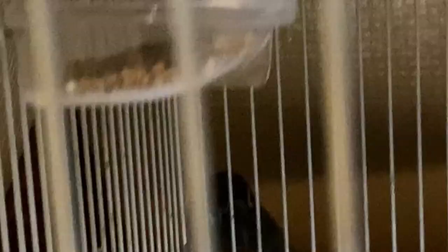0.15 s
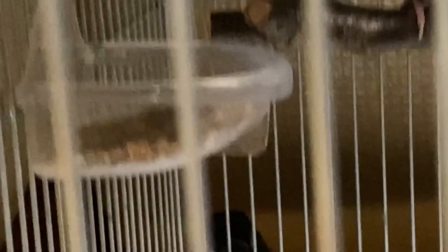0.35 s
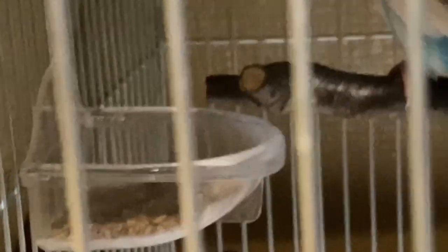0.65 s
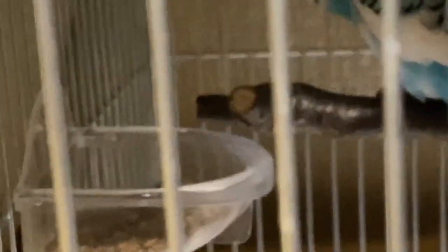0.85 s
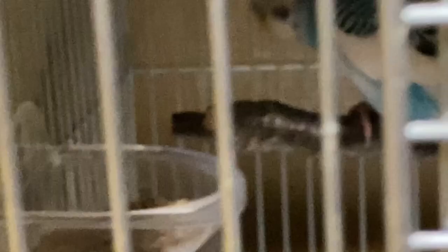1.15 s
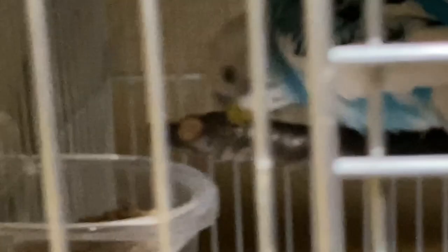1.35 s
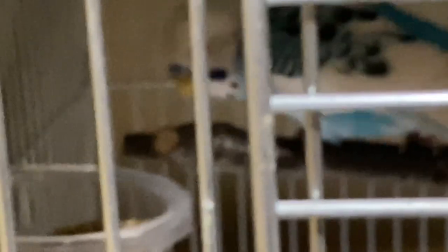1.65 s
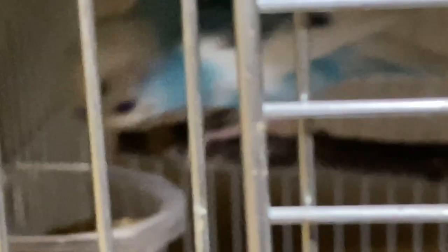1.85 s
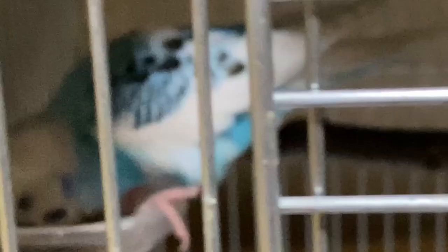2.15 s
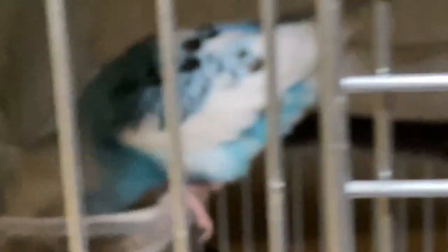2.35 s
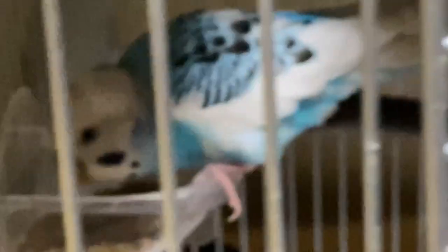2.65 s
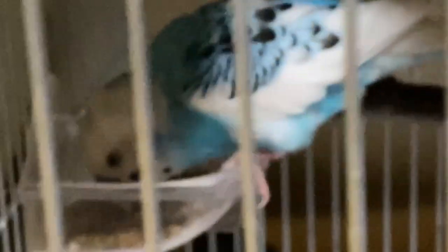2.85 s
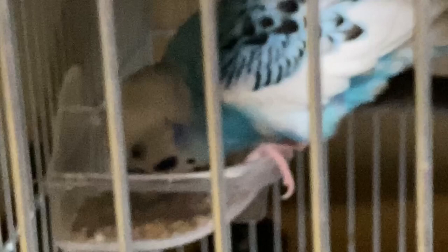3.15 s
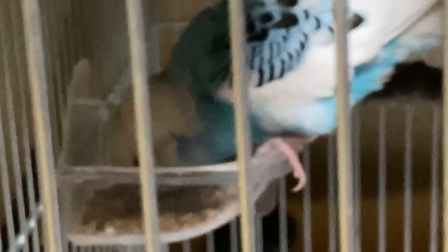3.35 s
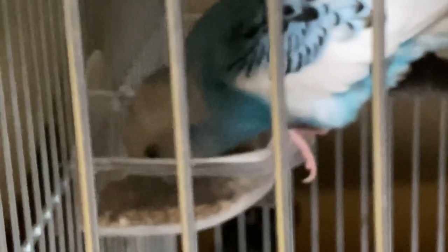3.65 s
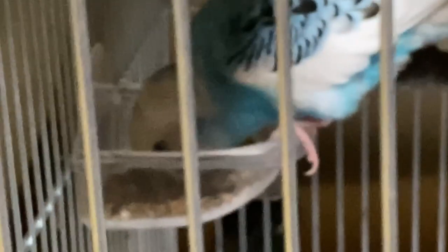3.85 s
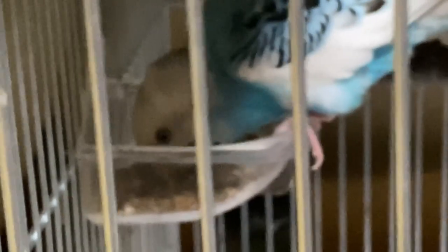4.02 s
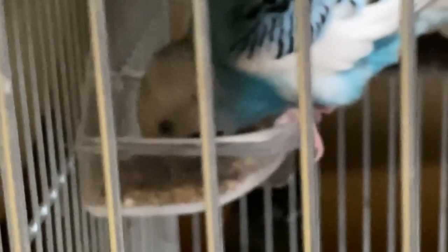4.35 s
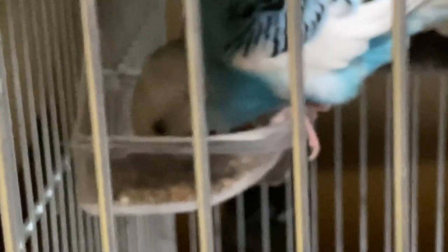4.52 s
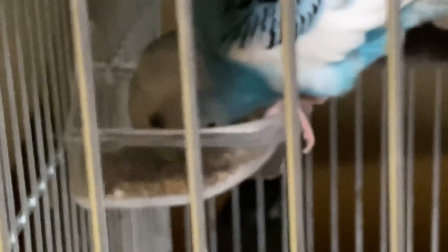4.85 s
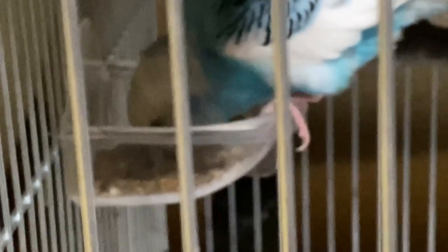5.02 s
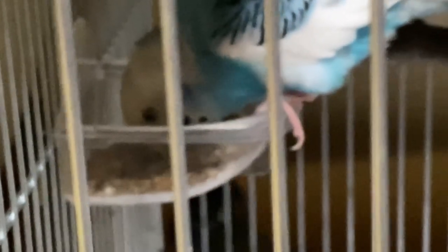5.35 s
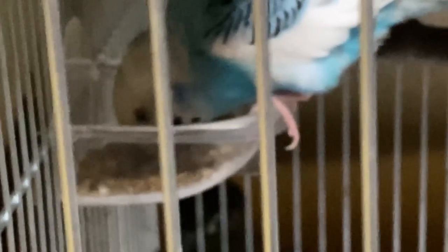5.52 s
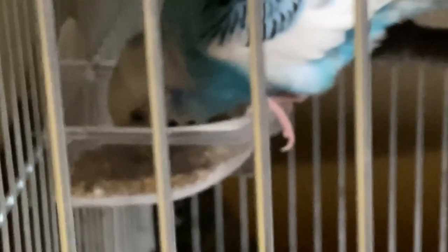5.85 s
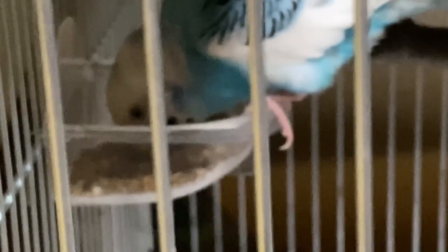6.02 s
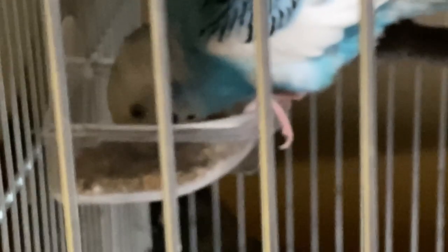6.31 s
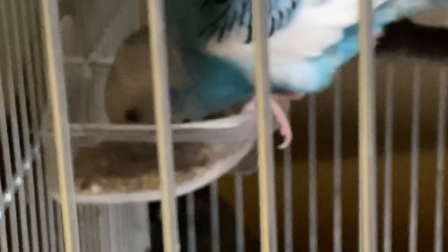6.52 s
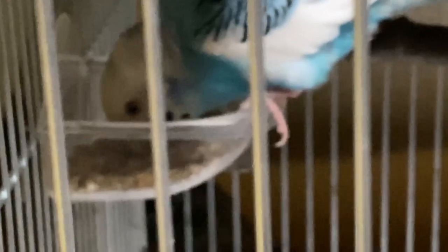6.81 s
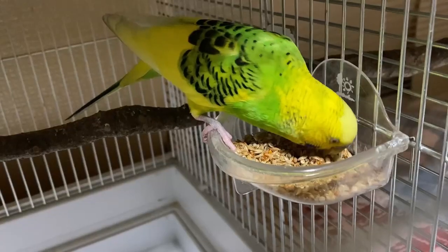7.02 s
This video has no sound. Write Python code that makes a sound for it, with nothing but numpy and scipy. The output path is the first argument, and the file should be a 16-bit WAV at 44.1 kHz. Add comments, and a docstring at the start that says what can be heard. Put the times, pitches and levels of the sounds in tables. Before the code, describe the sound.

A budgerigar moves about a wire cage, knocking the bars so that they ring. It gives one brief, harsh two-part squawk, followed by a soft murmur and a ruffle of feathers. Its feet thud along the perch and its claws tick on a plastic dish. Then it stirs seed and cracks husks, with occasional knocks on the cage. The microphone is close, in a quiet room with faint hiss and rumble.

```python
"""A quiet room, budgerigars in a wire cage, heard close up on a hand-held phone's two microphones.
One bird's syrinx buzzes out a harsh two-part squawk; a soft murmur and a ruffle of feathers follow.
It steps along its perch to a plastic dish, claws ticking on the rim, then stirs seed and cracks husks.
Feet and beaks knock the cage, whose bars and wires ring. Faint hiss and low rumble lie underneath."""
import sys
import numpy as np
from scipy import signal
from scipy.fft import rfft, irfft
from scipy.io import wavfile

SR = 44100
rng = np.random.default_rng(int(sys.argv[2]) if len(sys.argv) > 2 else 0)


def wav_out(sig):
    """Save sig, one row per channel (or a flat mono array), as 16-bit PCM at SR to the path in sys.argv[1]."""
    wavfile.write(sys.argv[1], SR, np.round(np.clip(np.atleast_2d(sig).T, -1, 1) * 32767).astype(np.int16))


N = 316638
TIME = np.arange(N) / SR
AT_DISH_S = 2.6  # from here on the bird is at the dish
SIDES = np.array([[1], [-1]])  # opposite signs in left and right

# soft ticks and rustles, later the beak in loose seed: (t/s, level/dB, brightness/dB per octave, hold/s)
RUSTLES = [(1.359, -31, -1.5, 0.015), (1.427, -35, -3, .008), (1.732, -41, 4, 0.073),
           (1.964, -36.5, 7.5, 0.044), (2.138, -36, 4, 0.04), (2.193, -41, -2, 0.021), (2.746, -43, 5, .02),
           (2.831, -49, -2.5, 0.021), (3.628, -40.5, 2, 0.019), (3.803, -40, 4, 0.015),
           (3.858, -48.5, -1.5, 0.0059), (4.188, -43.5, 1, .02), (4.208, -39.5, 1, 0.049),
           (4.273, -47, -2.5, .03), (4.519, -39, 0.5, 0.052), (4.702, -51.5, 12, 0.032),
           (4.855, -41.5, 6, 0.047), (4.968, -39.5, 3, .075), (5.041, -45.5, -3, .04),
           (5.326, -43, 0, .025), (5.6725, -40, 1.5, .025), (5.725, -45, 4, 0.03), (5.872, -45.5, 1, 0.018),
           (6.048, -35.5, -1, 0.01), (6.172, -42, -1, 0.027), (6.541, -36.5, 2, .012), (6.909, -35, 4, .04),
           (6.948, -41.5, 0, 0.037), (6.987, -39.5, 4.5, 0.052), (7.103, -31.5, 4.5, .05)]
# spectrum of scraping claws: (f/Hz, level/dB)
CLAW_SPECTRUM = [(150, -29), (250, 2), (337, -3), (375, -12.5), (570, 3), (1050, -8), (1580, -6.5),
                 (2300, -15), (2920, -15), (4720, -16), (6190, -21.5), (7300, -18.5), (9000, -30),
                 (11700, -56.5), (19800, -120)]
# claws tick on the dish rim, then husks snap: (t/s, level/dB, brightness/dB per octave, resonance/Hz)
SHARP_CLICKS = [(1.853, -44.5, 3.5, 11900), (1.9123, -39.5, 8, 5430), (1.9274, -33.5, 8, 6000),
                (1.938, -27, 11, 9200), (2.065, -41, 11.5, 11600), (2.095, -40.5, 9, 6500),
                (2.124, -34.5, 14.5, 1790), (2.601, -60.5, 12, 11200), (2.6982, -39.5, 4, 1780),
                (2.711, -32, 1, 13000), (3.049, -24, 2, 3970), (3.079, -28.5, 3.5, 6470),
                (3.0814, -27, 1.5, 3500), (3.1731, -48, 3, 9300), (3.257, -43, 0, 4000),
                (3.897, -44.5, 1.5, 10860), (4.0128, -46, 3, 12950), (4.032, -34.5, 3, 12960),
                (4.0795, -51, 0.5, 12000), (4.346, -44, 1.5, 12000), (4.3608, -23.5, -1, 13600),
                (4.407, -38, -4.5, 13200), (4.7893, -29, -2, 14000), (5.2626, -35, 2.5, 4250),
                (5.286, -30.5, -2.5, 3880), (5.42, -43.5, -2, 12000), (6.022, -33.5, -3.5, 5000),
                (6.3014, -18, -1.5, 2300), (6.347, -29, 3.5, 8940), (6.3562, -32.5, -3.5, 1900),
                (6.478, -37.5, 3, 11000), (6.4838, -30, 6, 6000), (6.512, -29, 0, 9000),
                (6.637, -50.5, 2, 6980), (6.7357, -40, -0.5, 1784), (6.8315, -42.5, 10.5, 11900),
                (6.8424, -34, 0, 5140), (7.021, -44, 12, 1796)]


def gain_of(db):
    """Decibels to amplitude."""
    return 10 ** (np.asarray(db) / 20)


def unit_rms(x):
    """Scales to rms 1."""
    return x / np.sqrt(np.mean(x ** 2) + 1e-20)


def unit_energy(x):
    """Scales each channel to energy 1."""
    return x / np.sqrt(np.sum(x ** 2, axis=-1, keepdims=True) + 1e-20)


def rise(t, rise_s):
    """An attack that eases from 0 towards 1."""
    return 1 - np.exp(-t / rise_s)


def decay(t, t60):
    """A fall of 60 dB every t60 seconds."""
    return gain_of(-60 * t / t60)


def read(points, hz):
    """Reads a table on a log-frequency axis."""
    f, value = np.transpose(points)
    return np.interp(np.log(hz + 1), np.log(f + 1), value)


def add(mix, s, sound):
    """Adds a sound into the mix at s seconds."""
    part = mix[..., max(round(s * SR), 0):][..., :sound.shape[-1]]
    part += sound[..., :part.shape[-1]]


def colour(x, points, size=2048):
    """Minimum-phase filter with the spectrum (f/Hz, level/dB)."""
    db = np.maximum(read(points, abs(np.fft.fftfreq(size, 1 / SR))), -140)
    response = np.exp(np.conj(signal.hilbert(np.log(gain_of(db)))))
    impulse = np.fft.ifft(response).real.reshape((1,) * (x.ndim - 1) + (-1,))
    return signal.fftconvolve(x, impulse, axes=-1)[..., :x.shape[-1]]


def tilted(points, db_per_octave, pivot_hz):
    """A spectrum made brighter or duller about a pivot."""
    return [(hz, db + db_per_octave * np.log2(hz / pivot_hz)) for hz, db in points]


def peaked(points, peak_hz, height_db, width_octaves):
    """A spectrum with one broad resonance added."""
    hz = np.geomspace(70, 16000, 90)
    return zip(hz, read(points, hz) + height_db * np.exp(-(np.log2(hz / peak_hz) / width_octaves) ** 2))


def noise(points):
    """Steady noise of rms 1 with a given spectrum."""
    spectrum = gain_of(read(points, np.fft.rfftfreq(N, 1 / SR)))
    return unit_rms(irfft(rfft(rng.standard_normal(N)) * spectrum, N))


def wander(count, hz):
    """A random curve of rms 1 that turns about hz times a second."""
    knots = rng.standard_normal(4096)
    return unit_rms(np.interp(np.arange(count) * hz / SR, np.arange(len(knots)), knots))


def grains(t, per_s, spread_db):
    """A sparse train of tiny clicks, a few of them large."""
    size = rng.choice([-1, 1], len(t)) * gain_of(spread_db * np.minimum(rng.exponential(1, len(t)), 4))
    return size * (rng.random(len(t)) < per_s / SR)


def resonate(x, hz, width_hz):
    """A resonance of gain 1 that follows the curve hz."""
    turn = np.exp(2j * np.pi * np.cumsum(hz * np.ones(len(x))) / SR)
    pole = np.exp(-np.pi * width_hz / SR)
    return 2 * (turn * signal.lfilter([1 - pole], [1, -pole], x / turn)).real


def ring(modes, t, detune=.025):
    """Struck modes of energy 1, each dying at its own speed and a little off pitch at every strike."""
    out = np.zeros(len(t))
    for hz, db, t60 in modes:
        hz *= 1 + detune * rng.uniform(-1, 1)
        out += gain_of(db) * decay(t, t60) * np.sin(2 * np.pi * (hz * t + rng.random()))
    return unit_energy(out)


def tail(t60s, count=32768):
    """A dense stereo ring that dies band by band, (f/Hz, t60/s), and is widest in the mids."""
    hz, t, bands = signal.stft(rng.standard_normal((2, count)), SR, nperseg=256)
    bands = bands * decay(t, read(t60s, hz)[:, None])
    side_db = read([(150, -9.5), (600, -6.5), (1400, -0.5), (2600, -13.0), (5000, -17.5)], hz)
    bands[1] *= gain_of(side_db)[:, None]
    mid, side = signal.istft(bands, SR, nperseg=256)[1][:, :count]
    return np.array([mid + side, mid - side]) / np.linalg.norm(mid)


def background(hiss_db=-78.5, hiss_side_db=-8, rumble_side_db=-20, lumps_db=2):
    """Faint room hiss and a lumpy, nearly mono rumble around the hand-held phone."""
    # spectra of the hiss and the rumble: (f/Hz, level/dB)
    hiss_spectrum = [(88, -34.5), (150, -3.5), (774, -15), (1660, -20), (4670, -29.5), (7770, -33),
                     (9080, -42), (10800, -33), (13200, -41), (15000, -37), (16000, -44)]
    rumble_spectrum = [(15, -44), (30, -15.5), (45, -5), (62, 3.5), (82, -6), (105, -1.5), (150, -14.5),
                       (250, -23), (500, -48)]
    # course of the handling rumble: (t/s, level/dB)
    handling = [(0, -60), (.6, -62), (1.0, -59), (1.8, -62.5), (2.3, -59), (2.6, -61), (3.8, -58.5),
                (4.25, -64), (4.7, -64), (5.35, -65.5), (5.85, -58), (6.3, -61.5), (6.8, -66), (7.18, -79)]
    hiss = noise(hiss_spectrum) + gain_of(hiss_side_db) * SIDES * noise(hiss_spectrum)
    rumble_db = np.interp(TIME, *np.transpose(handling)) + lumps_db * wander(N, 16)
    rumble = noise(rumble_spectrum) + gain_of(rumble_side_db) * SIDES * noise(rumble_spectrum)
    return gain_of(hiss_db) * hiss + gain_of(rumble_db) * rumble


def knocks(wires_db=-2, bars_db=-1, bars_side_db=-5, spot_db=-11, spot_t60=.17):
    """A blow clacks and rings the struck spot, the thin wires and the bars or, later, the cage wall."""
    # feet and beaks hit the cage: (t/s, level/dB, brightness/dB per octave, clack/dB, resonance/Hz)
    blows = [(0.204, -33, -1, -2, 753), (0.265, -20, 0, 3, 1470), (0.449, -40, 8.5, -2, 1413),
             (0.701, -31.5, 2, 0, 1570), (0.803, -25.5, -1.5, 0, 1385), (0.861, -25.5, 4.5, -1, 647),
             (1.024, -12, 3.5, 8.5, 1442), (1.524, -19.5, -0.5, 11.5, 1625), (1.949, -33.5, -1.5, 8, 587),
             (2.024, -36, -3.5, -10, 281), (2.164, -25.5, -1.5, 3, 1926), (2.229, -28.5, 1, -13, 1490),
             (2.293, -23.5, 2, 3.5, 4840), (2.417, -35.5, 2.5, -4.5, 1510), (2.489, -40.5, 3, 8, 1520),
             (2.563, -36.5, -0.5, -2, 1596), (2.662, -30.5, 0.5, -12, 1580), (2.799, -42.5, -1, -11, 1530),
             (2.832, -40, 1, -8, 1560), (2.889, -35, 2, -7, 1590), (3.927, -25, 2, 2.5, 1703),
             (5.436, -16.5, 4, 3, 310), (5.446, -20, 0, -10, 1244), (5.529, -16, -1, 7.5, 1600),
             (5.967, -22.5, -2, 2, 1383), (6.258, -26.5, 2, 0, 1295), (6.423, -36.5, 1.5, 9, 1263),
             (7.113, -26.5, 5, 6, 1436)]
    # modes of the bars and of the cage wall that carries the dish: (f/Hz, level/dB, t60/s)
    bar_modes = [(326, -6.5, .8), (473.6, -8, .3), (565, -0.5, .5), (688, 1.5, .35), (760, 0, 0.42),
                 (1025, -8.5, 1), (1114, -10.5, .8), (1208, -5, 0.63), (1440, 6, .14), (1569, 5.5, 0.21),
                 (1722, -4, 0.43), (1840, -1.5, 0.44), (2265, -5, .55), (2540, 0, .3), (2661, 0, .2),
                 (3350, 1, .5), (3480, 1, .35), (3600, 0, .3), (4740, 1, .42), (4990, 0, .25)]
    wall_modes = [(339, -2.5, 0.64), (476, -3, .27), (565, 0.5, 0.45), (681, -0.5, .25), (775, -1.5, .4),
                  (942, -5, .4), (1010, -11, 1), (1112, -7.5, 0.5), (1197, -7, 0.88), (1250, -8, 0.52),
                  (1375, 4, 0.17), (1610, 2, 0.23), (1707, 0.5, 0.29), (1845, -1, 0.27), (2616, -1, .25),
                  (2900, -5, .2), (3289, -2, .35), (3490, -3, .25), (4300, -2, .28), (4900, -3, .28)]
    # how long the wires ring at those two places: (f/Hz, t60/s)
    wire_t60s = [(200, 1), (600, 1), (1100, 0.9), (1800, 0.62), (3400, 0.7), (5000, 0.3495), (8000, 0.073)]
    wall_t60s = [(200, 0.64), (350, 0.92), (680, 0.52), (900, 0.76), (1150, 1.25), (1500, 0.54), (2500, .5),
                 (5000, .38), (8000, .1)]
    # spectra of the thin clack and of the whole cage: (f/Hz, level/dB)
    clack_spectrum = [(150, -12), (600, 1.5), (1600, 1.5)]
    cage_spectrum = [(70, -10.5), (180, 0), (300, 2.5), (410, 0.5), (620, 4), (1400, -3), (2800, -8),
                     (5700, -18.5), (11300, -43), (16000, -57.5)]
    out, hz = np.zeros((2, N)), np.geomspace(250, 8000, 90)
    for s, level_db, brightness, clack_db, ring_hz in blows:
        modes, t60s = (bar_modes, wire_t60s) if s < AT_DISH_S else (wall_modes, wall_t60s)
        wires = tail(t60s)
        t = np.arange(wires.shape[-1]) / SR
        blow = unit_energy(rng.standard_normal(len(t)) * decay(t, .068) * rise(t, .0016))
        bars = ring(modes, t, detune=.008) + gain_of(bars_side_db) * SIDES * ring(modes, t, detune=.0096)
        spot = ring([(ring_hz, 0, spot_t60), (0.9 * ring_hz, -3, spot_t60)], t, detune=.008)
        ringing = gain_of(wires_db) * wires + gain_of(bars_db) * bars + gain_of(spot_db) * spot
        hit = gain_of(clack_db) * colour(blow, clack_spectrum) + ringing * rise(t, .003)
        ripple = np.transpose([hz, rng.uniform(-5, 2, len(hz))])  # each spot favours other resonances
        body = peaked(cage_spectrum, ring_hz, height_db=6, width_octaves=.64)
        add(out, s, gain_of(level_db) * colour(colour(hit, ripple), tilted(body, brightness, 1400)))
    return out


def squawk(length, top_db, top_hz, open_hz, shut_hz, flutter_hz=340, jitter=.05, rough=.52):
    """The syrinx buzzes in uneven bursts through fixed resonances and one that sinks as the beak shuts."""
    # narrow resonances of bird and cage that colour the squawk: (f/Hz, width/Hz, level/dB)
    resonances = [(1360, 73, -33), (2126, 60, -6.5), (2410, 140, -8), (3150, 37, -20.5), (3120, 33, -21),
                  (3730, 32, -11), (3710, 76, -9.5), (4000, 89, -12.5), (4740, 98, -4), (5360, 85, 0.5),
                  (6023, 44, -4), (6180, 13, -4.5), (6600, 56, -2), (7400, 42.6, -16), (7800, 17, -12),
                  (8602, 32, -17)]
    # broad spectrum of the rasp: (f/Hz, level/dB)
    rasp_spectrum = [(290, -73), (500, -50.5), (1360, -20), (1620, -17.5), (2070, -7), (2650, -13.5),
                     (3110, -10.5), (3390, -12.5), (5970, -3), (7980, -13), (8700, -21.5), (9220, -35),
                     (10100, -34), (14700, -36.5), (16000, -43)]
    quiet_db, quiet_hz = -54.5, 874  # effort and pitch at the onset
    sag_db, catch_db, peaks_db, beak_db = 3, 6.5, 6.5, -6.5
    swell_share, fade_share = .38, .29
    extra_width_hz, beak_width_hz = 130, 900
    t = np.arange(0, length, 1 / SR)
    progress = t / length
    push = (np.minimum(progress / swell_share, 1) * np.minimum((1 - progress) / fade_share, 1)) ** .75
    effort_db = quiet_db + (top_db - quiet_db) * push
    effort_db -= sag_db * np.maximum(progress - swell_share, 0) / (1 - swell_share)
    effort_db -= catch_db * np.exp(-((progress - .6) / .04) ** 2)  # the voice catches once
    hz = quiet_hz + (top_hz - quiet_hz) * (effort_db - quiet_db) / (top_db - quiet_db)
    turns = np.cumsum(hz * (1 + jitter * wander(len(t), 900))) / SR
    buzz = unit_rms(sum(np.cos(2 * np.pi * (k * turns + rng.random())) for k in range(1, 12)))
    flutter = np.cumsum(flutter_hz * (1 + .25 * wander(len(t), 250))) / SR
    bursts = .8 + np.cos(np.pi * flutter) ** 4
    drive = bursts * ((1 - rough) * buzz + rough * rng.standard_normal(len(t)))
    peaks = sum(gain_of(db) * resonate(drive, f, width + extra_width_hz) for f, width, db in resonances)
    beak_hz = open_hz + (shut_hz - open_hz) * progress ** 2
    beak = unit_rms(resonate(resonate(drive, beak_hz, beak_width_hz), beak_hz, beak_width_hz))
    rasp = unit_rms(unit_rms(colour(drive, rasp_spectrum)) + gain_of(peaks_db) * unit_rms(peaks))
    rasp = unit_rms(rasp + gain_of(beak_db) * push * beak)
    # as the syllable dies away, the fundamental stands out of the rasp
    tone = gain_of(-27 + .41 * effort_db) * progress ** 4 * unit_rms(bursts * np.sin(2 * np.pi * turns))
    voice = (gain_of(effort_db) * rasp + tone) * signal.windows.tukey(len(t), .05)
    # so small a beak radiates little bass
    return colour(voice, [(300, -23), (600, -15.5), (950, -1.5), (8400, -.5), (9500, -10.5), (16000, -4)])


def feathers(start_s=1.248, attack_s=.025, hold_s=.2, release_s=.031, level_db=-54.5, flutter_db=1.5):
    """Feathers whirr as the bird moves off; a faint rustle lingers while it crosses the perch."""
    # spectrum of the ruffle: (f/Hz, level/dB)
    spectrum = [(40, -3.5), (80, 5), (150, -4), (250, 2), (400, -18.5), (600, -9.5), (1200, -20.5),
                (3000, -23.5), (6000, -28.5), (9000, -39), (16000, -46)]
    settling_db, settled_s = -31, 1.76
    t = TIME - start_s
    shake = np.exp(-np.maximum(t - attack_s - hold_s, 0) / release_s)
    settling = gain_of(settling_db) * np.exp(-np.maximum(TIME - settled_s, 0) / release_s)
    envelope = np.clip(t / attack_s, 0, 1) * (shake + settling)
    return noise(spectrum) * envelope * gain_of(level_db + flutter_db * wander(N, 54.7))


def murmur(length, level_db, settled_hz, slide=.07, settle_s=.032, fade_db_per_s=57, jitter=.04):
    """A soft, hoarse note with the beak shut: it starts sharp, settles and fades."""
    # partials of the note: (multiple of the pitch, level/dB)
    partials = [(1.001, 17.5), (2.07, 5.5), (3.478, 1.5)]
    t = np.arange(0, length, 1 / SR)
    hz = settled_hz * (1 + slide * np.exp(-t / settle_s))
    turns = np.cumsum(hz * (1 + jitter * wander(len(t), 340))) / SR
    voice = sum(gain_of(db) * (1 + .57 * wander(len(t), 160.6)) * np.sin(2 * np.pi * k * turns)
                for k, db in partials)
    return gain_of(level_db - fade_db_per_s * t) * unit_rms(voice) * signal.windows.tukey(len(t), .1)


def rustles(fall_s=.019, dish_db=-17, clumps_db=3, slump_db_per_s=70, nibbles_per_s=4, nibble_db=-54):
    """Clumpy clouds of clicks: soft ticks and rustles, later seed that the beak stirs in the dish."""
    # modes of the plastic dish: (f/Hz, level/dB, t60/s)
    dish_modes = [(2120, 21, 0.023), (1660, 9, 0.045), (2600, -4, 0.055), (2986, -16, 0.031)]
    # spectrum of a rustle: (f/Hz, level/dB)
    spectrum = [(500, -7), (2150, 9.5), (3000, 5.5), (5000, 1.5), (8000, -1.5), (12600, 0.5), (16000, -11)]
    out, t = np.zeros(N), np.arange(8000) / SR
    gaps, sizes, shines = rng.random((40, 3)).T  # fainter nibbles come at random
    times = AT_DISH_S + np.cumsum(.5 + gaps) / nibbles_per_s
    nibbles = [(s, nibble_db + 6 * (size - .5), 4 * (shine - .5), 0)
               for s, size, shine in zip(times, sizes, shines) if s < N / SR]
    for s, level_db, brightness, hold_s in [*RUSTLES, *nibbles]:
        envelope = rise(t, .0011) * np.exp(-np.maximum(t - hold_s, 0) / fall_s)
        clicks = grains(t, per_s=2600, spread_db=4) * envelope
        cloud = unit_energy(clicks * gain_of(clumps_db * wander(len(t), 120) - slump_db_per_s * t))
        dish = unit_energy(signal.fftconvolve(cloud, ring(dish_modes, t))[:len(t)])
        rustle = cloud + gain_of(dish_db) * dish
        add(out, s, gain_of(level_db) * colour(rustle, tilted(spectrum, brightness, 6500)))
    return out


def rocking(events, offset_db, thump_hz=72, t60=.22):
    """The bird's movements rock the cage with low, short thumps that grow with their strength."""
    out, t = np.zeros(N), np.arange(8000) / SR
    thump = decay(t, t60) * np.sin(2 * np.pi * thump_hz * t)
    for s, level_db, *_ in events:
        add(out, s, gain_of(offset_db + .5 * level_db) * thump)
    return out


def claws(uneven_db=3):
    """Claws scrape in many tiny slips as the bird finds its footing."""
    # shuffling on the perch and the rim of the dish: (t/s, level/dB)
    shuffle = [(1.7, -77.5), (1.9, -73.5), (2.2, -80.5), (2.45, -73), (2.53, -89.5), (2.6, -93),
               (2.72, -74), (2.85, -88), (2.95, -83), (3.03, -96)]
    level_db = np.interp(TIME, *np.transpose(shuffle), left=-120, right=-120) + uneven_db * wander(N, 38)
    slips = grains(TIME, per_s=700, spread_db=3)
    return unit_rms(colour(slips, CLAW_SPECTRUM)) * gain_of(level_db)


def sharp_clicks(rattle_db=-4.5, echo_s=.0018, echo_db=-7):
    """Claws tick on the rim; from 3.05 s husks split. Each dry snap echoes off the dish and rattles."""
    # spectrum of a click: (f/Hz, level/dB)
    spectrum = [(350, -14), (900, -14.5), (1560, 2.5), (2200, 8), (3400, 8), (4700, 6.5), (7400, -0.5),
                (12000, 0.5), (16000, -4.5)]
    out, t = np.zeros(N), np.arange(6000) / SR
    for s, level_db, brightness, ring_hz in SHARP_CLICKS:
        snap = unit_energy(grains(t, per_s=6000, spread_db=4) * decay(t, .01) * rise(t, .0004))
        rattle = unit_energy(grains(t, per_s=3000, spread_db=4) * decay(t, .071))
        click = snap + gain_of(rattle_db) * rattle
        add(click, echo_s, gain_of(echo_db) * snap)
        body = peaked(spectrum, ring_hz, height_db=5, width_octaves=.53)
        add(out, s, gain_of(level_db) * colour(unit_energy(click), tilted(body, brightness, 4980)))
    return out


def steps(grip_s=.022):
    """Each footfall thuds the perch, and the claws scrape as they close on it."""
    # feet land on the perch and the rim of the dish: (t/s, level/dB, scrape/dB)
    footfalls = [(1.925, -27, -3), (1.975, -30, -19), (2.058, -31.5, -8), (2.163, -29.5, -7),
                 (2.225, -29, -17), (2.295, -29.5, -1), (2.345, -34.5, -3), (2.475, -36, -6),
                 (2.685, -29, -6), (2.765, -37, -15), (2.9, -40.5, -4.5)]
    # modes of the perch on its bars: (f/Hz, level/dB, t60/s)
    perch_modes = [(113, 2, 0.14), (195, 0, 0.14), (341.4, -11, 0.13), (568, -8, .16)]
    out, t = np.zeros(N), np.arange(12000) / SR
    for s, level_db, scrape_db in footfalls:
        slips = grains(t, per_s=400, spread_db=3) * np.exp(-t / grip_s)
        scrape = unit_energy(colour(slips, tilted(CLAW_SPECTRUM, db_per_octave=3, pivot_hz=1000)))
        step = ring(perch_modes, t) + gain_of(scrape_db) * scrape
        add(out, s, gain_of(level_db) * step * rise(t, .0045))
    return out


def pitched_ticks(crunch_db=-5):
    """Short crunches with a hollow pitch: beak taps on the dish and a falling run of mouth clicks."""
    # the taps and, just after 5 s, the mouth clicks: (t/s, level/dB, f/Hz)
    ticks = [(3.173, -44, 1250), (4.207, -44, 2270), (4.272, -43, 1742), (4.519, -38.5, 2155),
             (5.042, -41, 2160), (5.052, -43, 1450), (5.078, -45, 1277), (5.672, -35, 2155),
             (6.046, -37.5, 2050), (6.171, -39, 2200)]
    # partials of a tick: (multiple of the pitch, level/dB, t60/s)
    partials = [(.77, -7, .03), (.93, -5, .025), (1, -1, .045), (1.06, -2, .03), (1.2, -8, .025),
                (1.4, -9, .02)]
    out, t = np.zeros(N), np.arange(6000) / SR
    for s, level_db, hz in ticks:
        bits = unit_energy(grains(t, per_s=4000, spread_db=2.5) * decay(t, .05) * rise(t, .0015))
        hollow = ring([(k * hz, db, t60) for k, db, t60 in partials], t, detune=.015)
        tock = unit_energy(signal.fftconvolve(bits, hollow)[:len(t)])
        crunch = unit_energy(colour(bits, [(600, -20), (1500, -3), (2500, 0), (5000, -7), (16000, -22)]))
        add(out, s, gain_of(level_db) * (tock + gain_of(crunch_db) * crunch))
    return out


def room(x, wet_db, near_db):
    """The direct sound, quick reflections from the wall behind the cage, and the room's tail."""
    # reverberation of the room: (f/Hz, t60/s)
    room_t60s = [(200, 0.44), (1500, 1), (6000, 0.2297), (15000, 0.05)]
    near, far = tail([(200, .04), (16000, .034)]), tail(room_t60s)
    reflections = gain_of(near_db) * near + gain_of(wet_db) * far
    return x + signal.fftconvolve(x[None], reflections, axes=1)[:, :N]


def scene():
    """Voice, feeding and cage sounds as they reach a spot close to the wires."""
    # the squawk: (t/s, length/s, top effort/dB, top pitch/Hz, open beak/Hz, closing beak/Hz)
    syllables = [(1.043, .025, -32, 1100, 3950, 3550), (1.145, .0695, -18.7, 1478, 6300, 4700)]
    # soft notes after it: (t/s, length/s, level/dB, f/Hz)
    soft_notes = [(1.251, 0.293, -53.5, 721.2), (1.783, 0.048, -62.5, 700)]
    voice = np.zeros(N)
    for s, *syllable in syllables:
        add(voice, s, squawk(*syllable))
    for s, *note in soft_notes:
        add(voice, s, murmur(*note))
    thumps = rocking(SHARP_CLICKS, offset_db=-43) + rocking(RUSTLES, offset_db=-52.5)
    cage = knocks() + thumps + room(claws() + steps(), wet_db=-6, near_db=-8)
    calls = room(voice, wet_db=-23.5, near_db=-11.5)
    snaps = room(sharp_clicks(), wet_db=-23, near_db=-11)
    room_tone = background()
    rustling = room(feathers() + rustles(), wet_db=-22.5, near_db=-4)
    ticks = room(pitched_ticks(), wet_db=-21, near_db=-9)
    return calls + cage + snaps + room_tone + rustling + ticks


def record(dry):
    """The two microphone ports drift apart in phase in the high treble; the band ends at 16.5 kHz."""
    # phase between the ports: (f/Hz, left lead/rad)
    port_phase = [(0, 0), (1100, 0), (1500, .6), (2100, .3), (4100, .12), (7600, -.1), (9100, -3.14),
                  (11000, -6.28), (13400, -9.42), (15400, -12.57), (17000, -12.6)]
    half_turn = np.exp(.5j * np.interp(np.fft.rfftfreq(N, 1 / SR), *np.transpose(port_phase)))
    ports = irfft(rfft(dry) * np.array([half_turn, half_turn.conj()]), N)
    lowpass = signal.firwin(401, 16500, window=("kaiser", 9), fs=SR)
    return signal.oaconvolve(ports, lowpass[None], "same")


dry = scene()
out = record(dry)
wav_out(out)
```